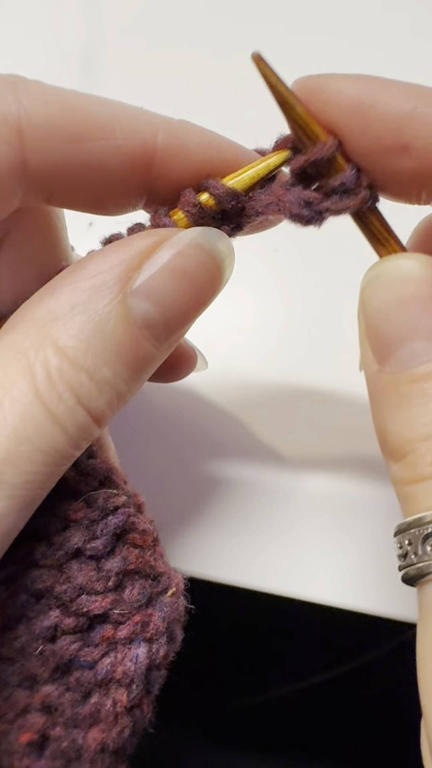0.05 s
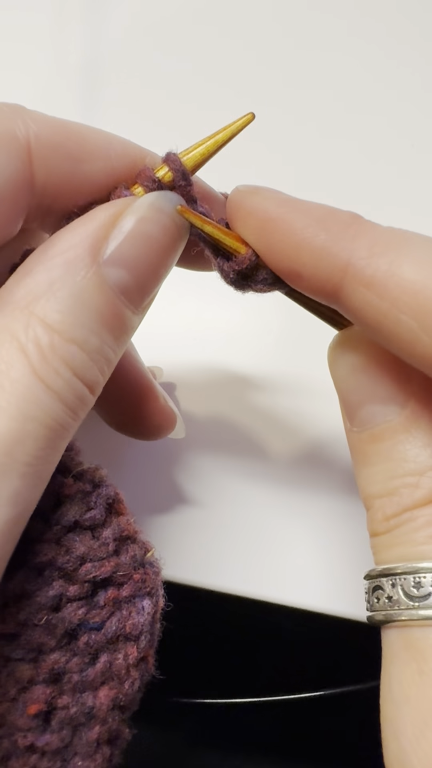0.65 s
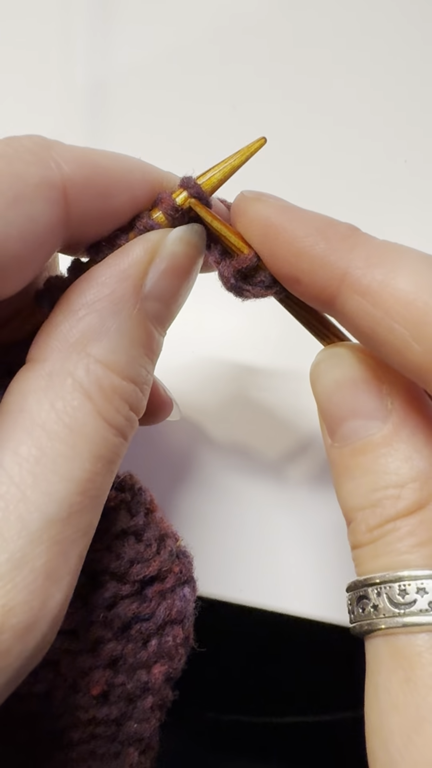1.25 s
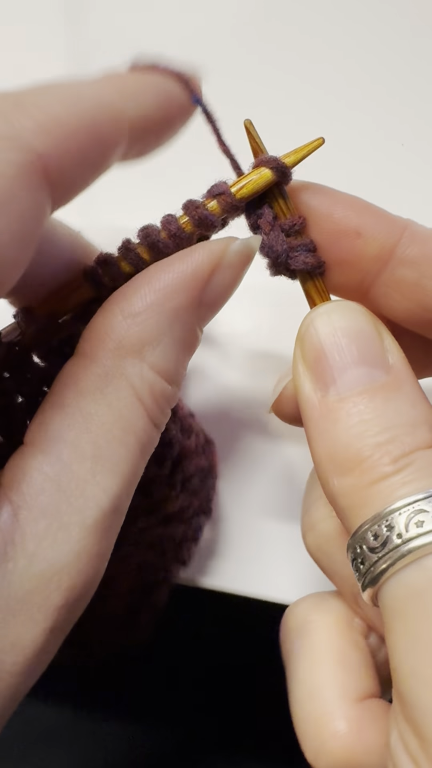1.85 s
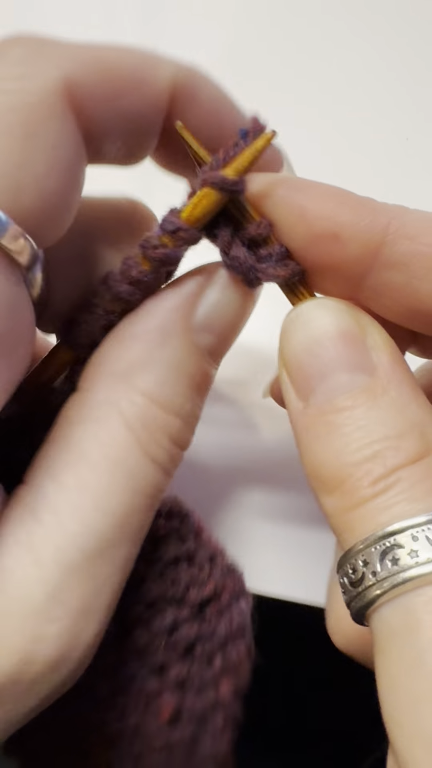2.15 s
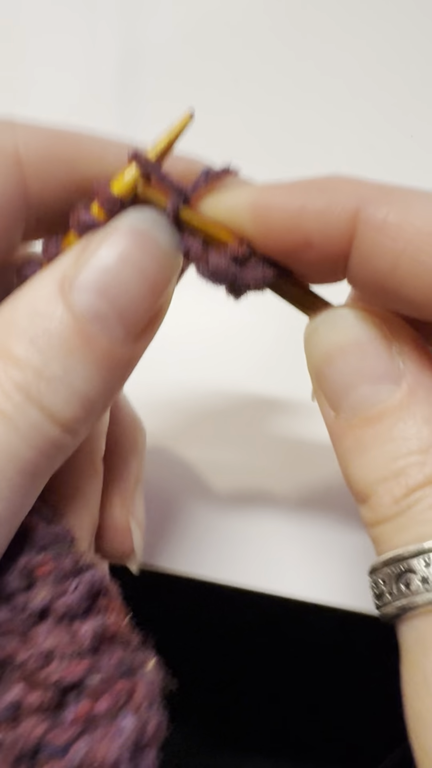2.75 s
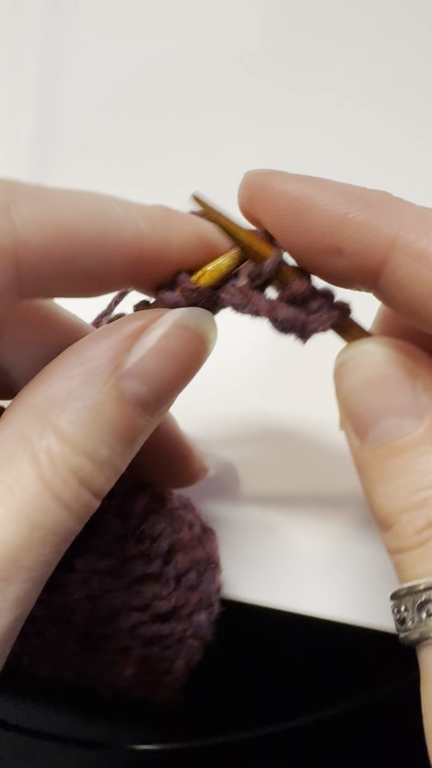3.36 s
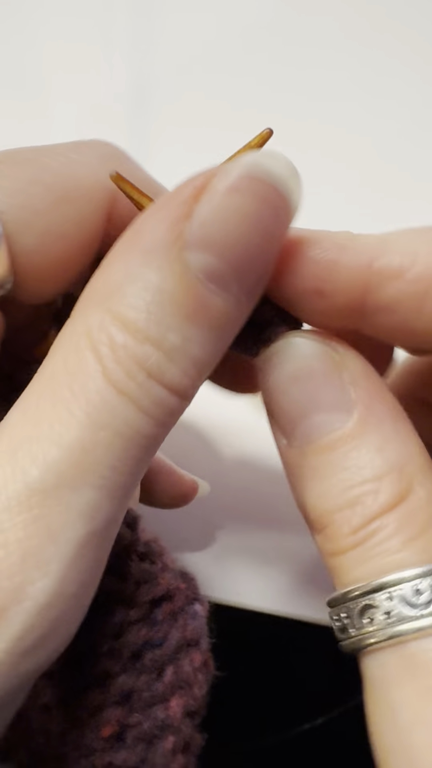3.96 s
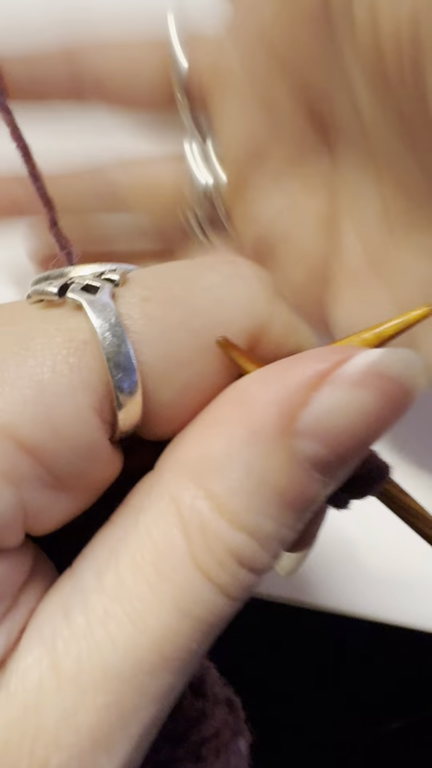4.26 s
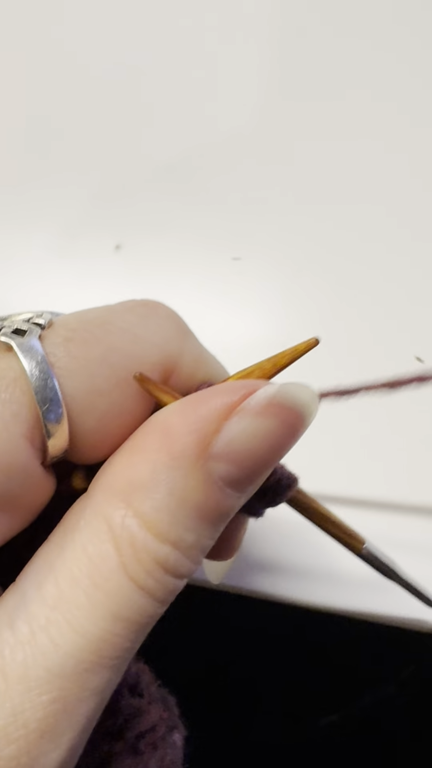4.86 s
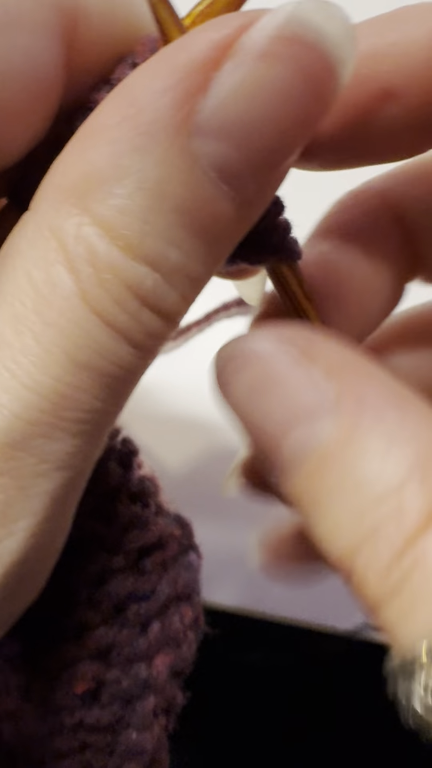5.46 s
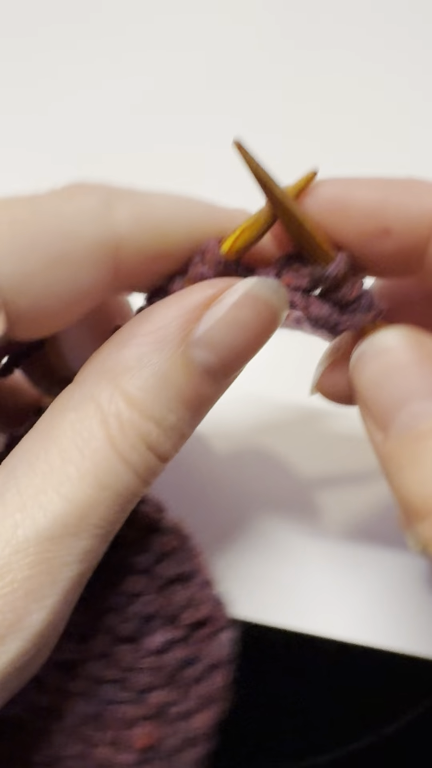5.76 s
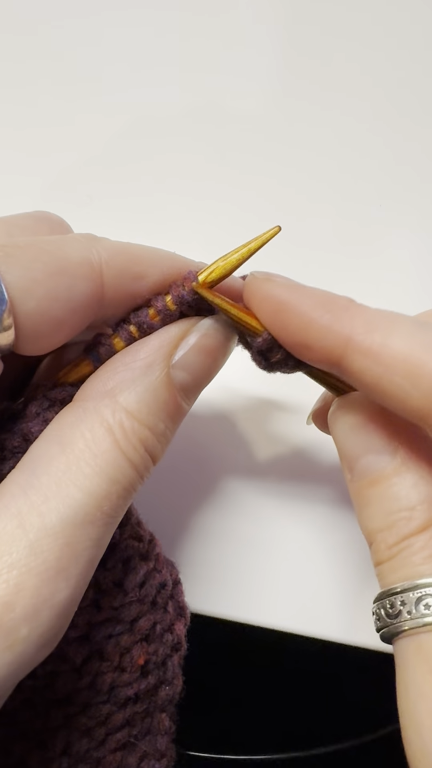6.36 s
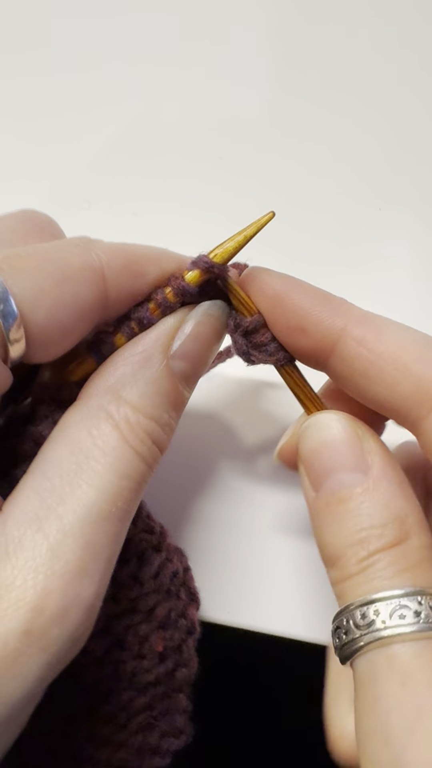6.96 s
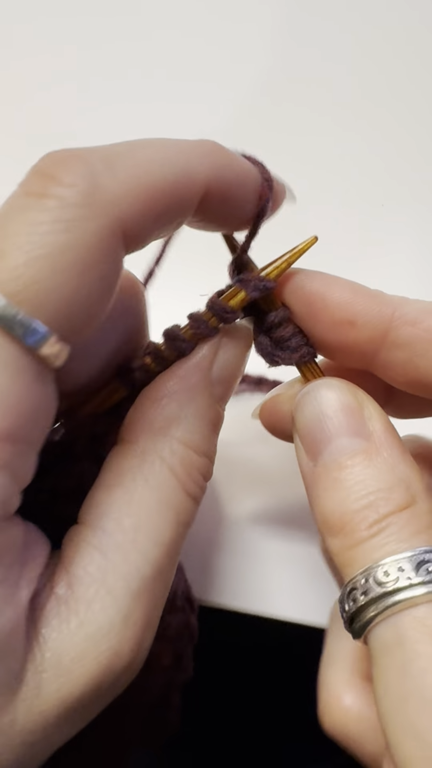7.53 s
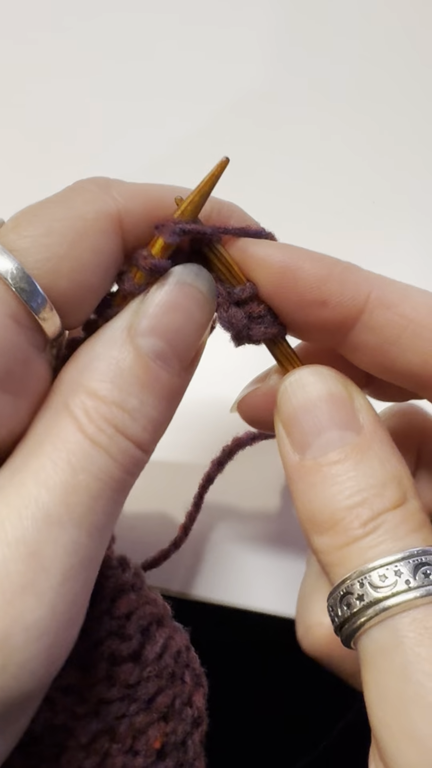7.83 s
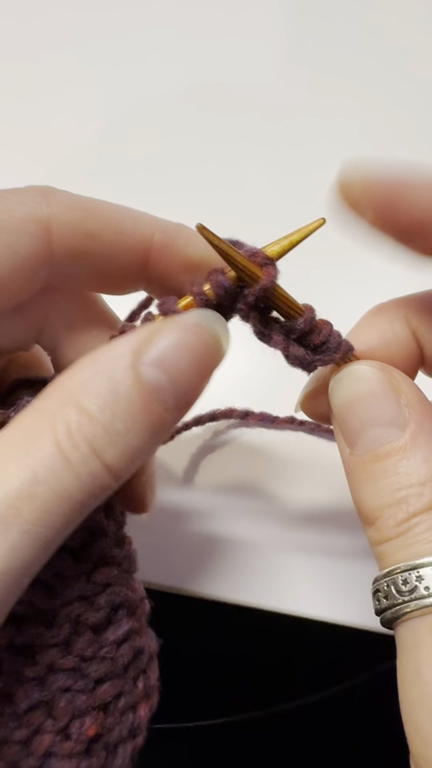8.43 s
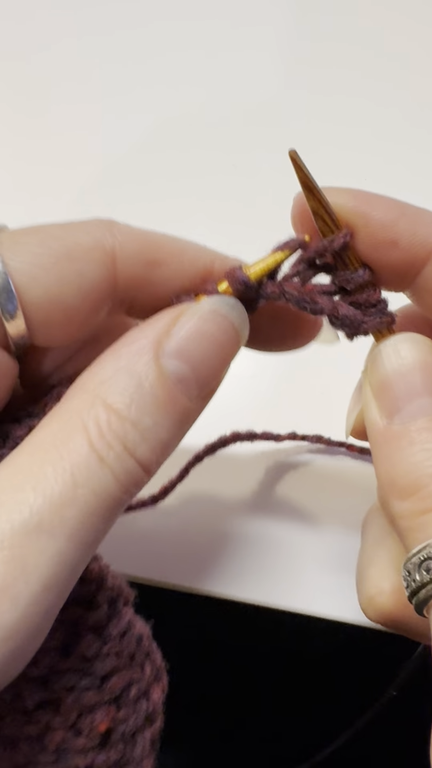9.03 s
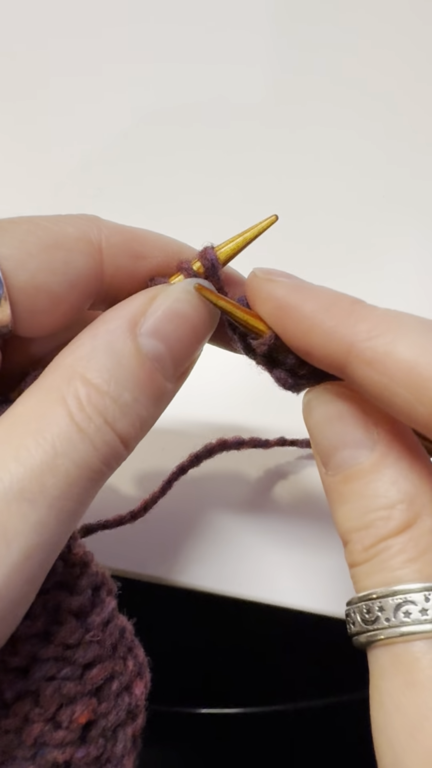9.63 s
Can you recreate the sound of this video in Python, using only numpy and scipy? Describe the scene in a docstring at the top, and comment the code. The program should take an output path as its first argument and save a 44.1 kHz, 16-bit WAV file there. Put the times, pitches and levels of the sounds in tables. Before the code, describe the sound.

Close, quiet knitting: soft yarn rasps and small needle clicks, interrupted midway by a short hard clatter and the low rub of pulled yarn.

```python
"""A quiet room, knitting close to a phone's two closely spaced microphone ports, over a soft rumble.
Wool fibres rasp over wooden needles; the tips tick, knock and graze each other.
Midway a hand tugs at the yarn, something hard clatters on the table a little further off,
and the strand runs off the ball with a low rub. Near the end comes one dry click of wood on wood."""
import sys
import numpy as np
from scipy import signal
from scipy.fft import rfft, irfft
from scipy.io import wavfile
from scipy.ndimage import uniform_filter1d

SR = 44100
rng = np.random.default_rng(int(sys.argv[2]) if len(sys.argv) > 2 else 0)


def unload_audio(sound):
    """Save the sound as a 16-bit wav file, at the path given as the first command line argument."""
    columns = np.transpose(np.atleast_2d(sound))
    # keep every value between -1 and 1, then stretch to whole-number steps
    steps = np.round(np.clip(columns, -1, 1) * 32767)
    wavfile.write(sys.argv[1], SR, steps.astype(np.int16))


N = 427329
TIME = np.arange(N) / SR
SIDES = np.array([[1], [-1]])  # sign of a side signal at the left and right port


def undb(db):
    """Decibels to gain."""
    return 10 ** (np.asarray(db) / 20)


def unit(x):
    """Scale to rms 1."""
    return x / np.sqrt(np.mean(x ** 2))


def along(points, hz):
    """Read (frequency [Hz], level [dB]) points on a log-frequency axis."""
    f, db = np.transpose(points)
    return np.interp(np.log(np.maximum(hz, 1)), np.log(f), db)


def colour(x, points, size=2048):
    """Minimum-phase filter with the given spectrum."""
    gain = undb(along(points, np.fft.rfftfreq(size, 1 / SR)))
    cepstrum = irfft(np.log(gain))
    cepstrum[1:size // 2] *= 2
    cepstrum[size // 2 + 1:] = 0
    impulse = irfft(np.exp(rfft(cepstrum)))
    return signal.fftconvolve(x, impulse)[:len(x)]


def band(x, lo_hz, hi_hz):
    """Band-pass."""
    sos = signal.butter(2, [lo_hz, min(hi_hz, SR / 2 - 1)], "band", fs=SR, output="sos")
    return signal.sosfilt(sos, x)


def walk(rate):
    """Smooth random drift of rms 1, with `rate` new values a second."""
    hold = max(int(SR / rate), 1)
    steps = np.repeat(rng.standard_normal(N // hold + 1), hold)
    return unit(uniform_filter1d(steps, hold)[:N])


def fade(t60, size=16384):
    """Exponential decay, 60 dB in t60 seconds."""
    return np.exp(-np.log(1000) * TIME[:size] / t60)


def ring(hz, t60, size=16384):
    """One struck mode."""
    return np.sin(2 * np.pi * hz * TIME[:size]) * fade(t60, size)


def burst(t60, points, rough=1, size=16384):
    """A contact: a sharp push and a rough after-rattle, with the energy of 1 ms at full level."""
    push = rough * rng.standard_normal(size) * fade(t60, size)
    push[0] = 1
    x = colour(push, points)
    return x / np.sqrt(np.sum(x ** 2) * 1000 / SR)


def slips(rate):
    """Fibres catching and letting go: `rate` random clicks a second, a few larger than the rest."""
    happens = rng.random(N) < rate / SR
    size_db = 2.2 * np.minimum(rng.exponential(size=N), 4)
    return happens * rng.standard_normal(N) * undb(size_db)


def add(out, s, x):
    """Mix a sound in at time s."""
    i = int(s * SR)
    out[..., i:i + x.shape[-1]] += x[..., :N - i]


# room air common to both ports: (frequency [Hz], level [dB])
AIR_SPECTRUM = [(20, -21.5), (45, -3), (65, 3.5), (97, -4), (130, -1.5), (165, -3), (290, -4.5),
                (390, -6.5), (560, -15.5), (800, -16), (1100, -24), (1700, -39), (4500, -45.5),
                (6300, -40.5), (9500, -47.5), (11500, -48), (15300, -38), (16200, -52.5)]
# room air between the ports: (frequency [Hz], side relative to mid [dB])
AIR_SIDE = [(100, -16.5), (300, -9), (500, -0.5), (800, 6), (1500, 0.5), (3000, -5.5), (8000, -8.5)]


def ventilation(level_db=-61):
    """Ventilation rumbles all around the microphone, wavering a little."""
    side_spectrum = [(hz, db + along(AIR_SIDE, hz)) for hz, db in AIR_SPECTRUM]
    mid = colour(rng.standard_normal(N), AIR_SPECTRUM, size=8192)
    side = colour(rng.standard_normal(N), side_spectrum, size=8192)
    return (mid + side * SIDES) / np.std(mid) * undb(level_db + .5 * walk(11))


def hum(hz=64.5):
    """A low background hum, drifting in phase and level."""
    return np.sin(2 * np.pi * hz * TIME + 0.63 * walk(6)) * undb(-72 + 2.5 * walk(6.7))


# strength of the whine's pips: (time [s], level [dB])
WHINE_LEVELS = [(1.3, -87), (2.8, -76.5), (6.9, -81.5), (8, -70), (9.5, -73.5)]


def whine(hz=6605, first_s=.215, period_s=.3705):
    """A very faint high tone pulses evenly in the background."""
    level = undb(np.interp(TIME, *np.transpose(WHINE_LEVELS)))
    pips = np.maximum(np.cos(2 * np.pi * (TIME - first_s) / period_s), 0) ** 14
    return level * pips * np.sin(2 * np.pi * hz * TIME)


def walls(x, t60_low, t60_high, wet_db, treble_db):
    """A small furnished room: a diffuse tail, shorter and weaker in the treble."""
    size = SR // 2
    noise = rng.standard_normal((3, size))
    noise = noise[0] + 0.29 * noise[1:]  # both ports hear nearly the same tail
    low = band(noise, 150, 4400) * fade(t60_low, size)
    high = undb(treble_db) * band(noise, 3500, 11000) * fade(t60_high, size)
    tail = (low + high) * np.clip(TIME[:size] / 0.0056, 0, 1)
    return undb(wet_db) * signal.fftconvolve(x[None], tail, axes=1)[:, :N]


# the room's answer to the clatter: (frequency [Hz], level [dB])
WASH_SPECTRUM = [(150, -14.5), (400, -5.5), (700, 2), (1100, -7), (1500, -3), (2500, -4), (3400, -2),
                 (5000, -7.5), (8000, -12), (15000, -20.5)]


def wash(x, gain_db=-47, t60=0.34):
    """The room answers the clatter with a soft, diffuse tail."""
    size = SR // 2
    common, left, right = (unit(colour(rng.standard_normal(size), WASH_SPECTRUM)) for _ in range(3))
    envelope = fade(t60, size) * np.clip(TIME[:size] / 0.012, 0, 1)
    tail = (common + 0.32 * np.array([left, right])) * envelope
    return undb(gain_db) * signal.fftconvolve(x[None], tail, axes=1)[:, :N]


# the table top's deep modes: (frequency [Hz], level [dB], t60 [s])
DEEP_MODES = [(108, 0.5, 0.098), (185, -1.5, 0.057)]


def thump(rise_s=.004):
    """The whole table top gives under a contact, building over a few milliseconds."""
    body = sum(undb(db) * ring(hz, t60) for hz, db, t60 in DEEP_MODES)
    return body * (1 - np.exp(-TIME[:len(body)] / rise_s))


# the table's modes, damped by the hand that lies on it: (frequency [Hz], level [dB], t60 [s])
TABLE_MODES = [(332, -6, 0.06), (503, 6, .04), (713, -3.5, 0.04), (978, 4.5, 0.042), (1118, 3, .04),
               (1285, -8.5, .04), (1447, 2.5, 0.05), (1588, 3.5, 0.042), (1680, -0.5, 0.037),
               (1880, -5, 0.021), (2105, -7.5, .04), (2244, -4.5, .045), (2670, -4.5, 0.033),
               (3430, -12.5, 0.04)]


def table_ring(lean_db, lag_s, detune=.02, scatter_db=2):
    """One blow at both ports; the middle modes arrive by reflection, later and weaker on the left."""
    out = np.zeros((2, SR // 2))
    spot = rng.standard_normal((len(TABLE_MODES), 2))  # each blow lands elsewhere and shifts the modes
    for (hz, db, t60), (shift, strength) in zip(TABLE_MODES, spot):
        reflected = 450 < hz < 1550
        mode = undb(db + scatter_db * strength) * ring(hz * (1 + detune * shift), t60, size=8192)
        mode = mode * rng.choice([-1, 1])
        add(out[0], reflected * lag_s, undb(-lean_db * reflected) * mode)
        add(out[1], 0, undb(lean_db * reflected) * mode)
    return out


# bright chatter of a hard contact: (frequency [Hz], level [dB])
RATTLE_SPECTRUM = [(400, -16.5), (1500, -12), (3800, -8), (5300, -17), (6500, -5.5), (8000, -5.5),
                   (9800, 0.5), (12500, -1.5), (14900, 9.5), (16500, -7.5)]
# the board's dense modes, merged into a rough clack: (frequency [Hz], level [dB])
BOARD_SPECTRUM = [(60, -13.5), (280, -3.5), (500, 2.5), (800, -2.5), (1100, 0), (1600, -0.5), (2000, -4.5),
                  (2500, -2), (3300, -12.5), (4300, -20), (12000, -31.5)]
# hard contacts on the table: (time [s], rattle [dB], rattle length [s], blow gain [dB], thump [dB])
TABLE_CONTACTS = [(4.2112, -27, 0.016, -27.5, -55.5), (4.217, -24, .002, -31, -39),
                  (4.2215, -15.5, 0.0009, -34.5, -60), (4.2334, -20.5, 0.005, -32.5, -55),
                  (4.245, -38.5, .003, -41, -59.5), (4.253, -39, 0.0036, -44, -61),
                  (4.2665, -12, 0.002, -23.5, -48), (4.270, -16, 0.0022, -26, -55),
                  (4.2745, -29.5, 0.0043, -25.5, -55), (4.2789, -18, 0.004, -22.5, -55),
                  (4.2822, -27, .005, -16.5, -27), (4.2893, -39, .003, -27, -40.5)]


def clatter():
    """Beyond the hands, each contact chatters brightly and shakes the table; the heavy ones thump."""
    out = np.zeros((2, N))
    t = TIME[:int(.05 * SR)]
    for s, rattle_db, length_s, blow_db, thump_db in TABLE_CONTACTS:
        direct, scattered = (unit(colour(rng.standard_normal(len(t)), RATTLE_SPECTRUM)) for _ in range(2))
        rattle = direct + undb(-16.5) * scattered * SIDES
        add(out, s, undb(rattle_db) * rattle * np.exp(-(t / length_s) ** 1.6))
        clack = burst(0.036, BOARD_SPECTRUM) + undb(-5.5) * burst(.04, BOARD_SPECTRUM) * SIDES
        add(out, s, undb(blow_db - 4) * clack)
        add(out, s, undb(blow_db - 12) * table_ring(lean_db=2.5, lag_s=0.00018))
        add(out, s, undb(thump_db) * thump())
    return out


# light rebounds on the table after the clatter: (time [s], level [dB])
BOUNCES = [(4.3056, -38), (4.318, -39), (4.3335, -46), (4.3452, -40.5), (4.352, -44)]


def rebounds():
    """The fallen thing settles in a few quick, uneven bounces, as bright as the needles' ticks."""
    out = np.zeros(N)
    for s, db in BOUNCES:
        snap = burst(.009, TIP_SPECTRUM, rough=.55)
        ringing = undb(-6.5) * burst(.009, SHAFT_SPECTRUM, rough=.41)
        body = undb(-9.5) * burst(.015, WOOD_SPECTRUM, rough=.24)
        add(out, s, undb(db) * (snap + ringing + body))
    return out


# the click, direct to the microphone: (frequency [Hz], level [dB])
CLICK_SPECTRUM = [(300, -26), (450, -7), (880, 1), (1100, 0), (1400, -8), (2000, 1), (2900, -15),
                  (3600, -23), (4900, -8), (6500, -22.5), (9500, -37), (12500, -22), (15000, -27)]
# its afterwash from the room: (frequency [Hz], level [dB])
AFTERWASH_SPECTRUM = [(300, -10), (1200, -1.5), (2500, -5), (3600, -14), (6500, -10), (10000, -15)]


def click(at_s=9.2322):
    """One dry click of wood on wood, with a faint, even afterwash."""
    out = np.zeros(N)
    add(out, at_s, undb(-32.5) * burst(0.0029, CLICK_SPECTRUM, rough=0.071))
    add(out, at_s, undb(-51.5) * burst(0.21, AFTERWASH_SPECTRUM))
    return out


# grazed needle shafts: (frequency [Hz], level [dB])
SCRAPE_SPECTRUM = [(700, -21.5), (1640, -5), (2500, -20), (3490, -7.5), (4600, -13.5), (5500, -8.5),
                   (6340, 1), (6900, -4.5), (7450, -4), (9500, -13), (15000, -19)]
# grazes near the microphone: (time [s], half width [s], level [dB])
GRAZES = [(1.738, .008, -68), (1.80, .005, -63), (1.86, 0.0064, -63.5), (1.896, .008, -63),
          (2.105, .012, -66), (2.19, .005, -67), (2.5528, 0.0047, -53), (2.829, 0.0049, -62.5),
          (2.979, 0.0053, -58.5), (3.058, .003, -67), (5.812, .005, -64), (7.207, .006, -65),
          (7.287, .004, -60.5), (7.495, .014, -66), (7.993, 0.0055, -63), (8.177, 0.0046, -62),
          (8.384, 0.0037, -58.5), (8.845, .005, -65), (9.015, .008, -65), (9.11, .008, -73)]


def scrapes():
    """A tip grazes the other needle: a brief cluster of slips that rings the shafts."""
    pressure = np.zeros(N)
    t = TIME[:SR // 8] - 1 / 16
    for s, width_s, db in GRAZES:
        add(pressure, s + t[0], undb(db) * np.exp(-np.abs(t) / width_s))
    return pressure * unit(colour(slips(rate=6000), SCRAPE_SPECTRUM))


# needle across needle, close up: (time [s], level [dB], pitch [Hz], t60 [s])
NEEDLE_SCUFFS = [(4.592, -51, 2030, .1), (4.724, -57, 1980, 0.067), (5.073, -40, 550, 0.077),
                 (5.074, -54, 1600, 0.069), (7.140, -46, 1000, 0.13), (7.19, -48.5, 850, 0.075),
                 (7.984, -54.5, 1690, 0.07)]


def scuffs():
    """One needle scuffs across the other and chatters around one pitch."""
    out = np.zeros(N)
    for s, db, hz, t60 in NEEDLE_SCUFFS:
        spectrum = [(hz / 4, -18), (hz * 0.23, -7), (hz, 0), (hz * 1.35, -13), (hz * 8, -36)]
        add(out, s, undb(db) * burst(t60, spectrum))
    return out


# close knocks: (time [s], level [dB], pitch [Hz], t60 [s], relative snap [dB])
DAMPED_KNOCKS = [(2.827, -39, 290, 0.027, -45), (2.98, -34.5, 268, 0.063, -45),
                 (3.483, -42.5, 430, 0.017, -40), (3.959, -42, 70, 0.092, -43),
                 (4.046, -36, 73, 0.061, -49), (4.459, -35, 304, 0.093, -41), (4.63, -37, 60, 0.14, -58),
                 (4.757, -33.5, 273, 0.1, -43), (5.158, -54.5, 950, 0.094, -30),
                 (5.197, -37, 242, 0.025, -40), (7.139, -47, 1380, 0.017, -18),
                 (7.142, -46.5, 1020, .016, -29), (7.18, -53, 1200, 0.032, -30),
                 (7.1944, -44.5, 946, 0.019, -30)]


def knocks():
    """Needles and hands knock: one mode, damped by fingers and wool, under a tiny bright snap."""
    out = np.zeros(N)
    snap = ring(4900, 0.0021) + undb(-8) * ring(12400, 0.0029)
    for s, db, hz, t60, snap_db in DAMPED_KNOCKS:
        body = ring(hz, t60)
        body *= 1 - np.exp(-2 * hz * TIME[:len(body)])  # a cushioned push takes half a cycle to build
        add(out, s, undb(db) * (body + undb(snap_db) * snap))
    return out


# a needle's tip, shaft and wooden body, each: (frequency [Hz], level [dB])
TIP_SPECTRUM = [(4000, -34.5), (8000, -24), (10000, -7), (12000, -4), (15000, 4), (16500, -8.5)]
SHAFT_SPECTRUM = [(1500, -30.5), (3200, -22), (4500, -8), (5700, -3), (6800, -0.5), (8200, -5.5),
                  (10000, -12), (14000, -29.5)]
WOOD_SPECTRUM = [(400, -19.5), (900, -1.5), (1600, 1), (2400, -5.5), (3200, -11), (4800, -16.5),
                 (8000, -27), (14000, -34)]
# light touches near the microphone: (time [s], tip [dB], shaft [dB], body [dB])
TIP_TOUCHES = [(0.8, -61, -75, -80), (1.799, -52, -51, -78), (2.3033, -45, -50.5, -60),
               (2.412, -46.5, -60, -69), (2.6521, -53, -70, -81), (3.242, -49, -62, -76),
               (3.396, -43, -49.5, -64), (3.483, -38, -38, -58), (3.836, -44, -43.5, -52.5),
               (4.135, -57, -61, -86), (4.1826, -52, -62.5, -65), (4.828, -38.5, -52, -51),
               (5.13, -46, -54.5, -59), (5.185, -33.5, -56, -57), (5.3537, -44, -53.5, -62),
               (5.402, -39, -57, -61), (5.532, -38, -52, -66), (6.044, -55, -49, -75),
               (6.236, -73, -71, -82.5), (6.297, -66.5, -63, -73), (6.668, -76.5, -72, -85),
               (6.7599, -59, -69, -70), (7.3081, -47, -49, -59), (7.7748, -27.5, -37.5, -51.5),
               (8.0285, -52, -66, -73), (8.4081, -60, -56, -61), (8.4138, -62, -58, -65),
               (9.388, -53, -70.5, -76)]


def ticks():
    """Needle tips and nails touch: the tip snaps, the shaft rings, the wooden body sounds longest."""
    out = np.zeros(N)
    for s, tip_db, shaft_db, body_db in TIP_TOUCHES:
        add(out, s, undb(tip_db) * burst(0.0039, TIP_SPECTRUM, rough=0.48))
        add(out, s, undb(shaft_db) * burst(0.0058, SHAFT_SPECTRUM, rough=0.2))
        add(out, s, undb(body_db) * burst(0.026, WOOD_SPECTRUM, rough=0.24))
    return out


def gesture(start, length, swell_s, release_s, sag_db_per_s=8.5):
    """Speed of one hand movement: it swells, holds while easing a little, and dies away."""
    speed = np.zeros(N)
    near = slice(max(int((start - .5) * SR), 0), int((start + length + .5) * SR))
    t = TIME[near] - start
    swell = (1 + np.tanh(t / swell_s / 2)) / 2
    ebb = (1 - np.tanh((t - length) / release_s / 2)) / 2
    speed[near] = swell * ebb * undb(-sag_db_per_s * np.clip(t, 0, length))
    return speed


def wander(x, depth_db=1, rate=28):
    """The point of contact shifts, so three treble bands each swell and sink on their own."""
    edges_hz = np.geomspace(1500, 10000, 4)
    return x + sum(band(x, lo, hi) * (undb(depth_db * walk(rate)) - 1)
                   for lo, hi in zip(edges_hz, edges_hz[1:]))


# wool close up: hissing fibres, the finest fibres, the tight strand, each: (frequency [Hz], level [dB])
FIBRE_SPECTRUM = [(900, -28), (2500, -23.5), (4000, -9.5), (5000, -8), (5900, -3.5), (6600, -4.5),
                  (7900, -4.5), (9700, -8), (12000, -22.5), (16000, -39.5)]
SHEEN_SPECTRUM = [(8000, -35.5), (9800, -14), (10900, -4), (13500, -1), (15400, 1.5), (16000, -22.5)]
DRAG_SPECTRUM = [(250, -6.5), (700, -1), (1400, -3), (2400, 0.5), (3300, -5), (5000, -5), (9000, -26)]


def rasp(hiss, drag, sheen):
    """Wool rubs in jerks: fibres hiss and scratch, the finest add sheen, the strand drags lower down."""
    fibres = undb(-2) * unit(colour(slips(rate=5000), FIBRE_SPECTRUM))
    scratch = unit(colour(slips(rate=500), SCRAPE_SPECTRUM)) * undb(-13 + 3.1 * walk(50))
    fine = unit(colour(slips(rate=6500), SHEEN_SPECTRUM))
    coarse = unit(colour(slips(rate=5000), DRAG_SPECTRUM))
    jerks = undb(walk(90) + 0.95 * walk(25))
    rub = wander(hiss * (fibres + scratch) + drag * coarse)
    return jerks * (rub + sheen * fine)


# fast runs of the strand: (time [s], half width [s], lower pitch [Hz], lower band [dB], upper band [dB])
FAST_RUNS = [(4.40, .02, 5820, -56, -57), (4.44, .018, 5600, -53, -53.5), (4.476, 0.023, 5500, -64, -68),
             (4.728, 0.01, 5360, -63, -63), (4.765, 0.02, 4750, -63, -55.5), (4.803, 0.015, 4300, -59, -53),
             (4.872, 0.024, 5480, -66, -66)]


def zips(width_hz=1300, upper_hz=8120, fall_hz_per_s=7160):
    """At its fastest the strand sings in two narrow bands; the lower falls as the free length grows."""
    out = np.zeros(N)
    t = TIME[:SR // 4] - 1 / 8
    for s, width_s, hz, low_db, high_db in FAST_RUNS:
        low, high = (unit(band(rng.standard_normal(len(t)), 20, width_hz / 2)) for _ in range(2))
        low *= undb(low_db) * np.sin(2 * np.pi * np.cumsum(hz - fall_hz_per_s * t) / SR)
        high *= undb(high_db) * np.sin(2 * np.pi * upper_hz * t)
        add(out, s + t[0], (low + high) * np.exp(-(t / width_s) ** 2))
    return out


# yarn drawn off the ball: (time [s], length [s], swell [s], low rub [dB], hiss [dB], drag [dB])
YARN_PULLS = [(4.306, 0.21, 0.0035, -45.5, -62.5, -59), (4.585, 0.092, 0.0033, -48, -67.5, -66),
              (4.734, 0.19, 0.0087, -45, -67, -62), (5.067, 0.23, .005, -59, -69.5, -69)]
# the strand's low rub: (frequency [Hz], level [dB])
RUB_SPECTRUM = [(30, -11), (60, -6.5), (150, -9.5), (220, -3.5), (285, 5), (400, -8), (600, -11.5),
                (1100, -23), (1700, -32.5), (4000, -48)]


def strand(hollow_hz=4100, echo_growth_per_s=2.4, echo_db=-8.5, ply_hz=93.3, ripple_db=1):
    """Pulled yarn rubs over ball and hand: a low flutter, a rasp with a falling hollow, short zips."""
    low = hiss = drag = 0
    drawn_s = np.zeros(N)  # time since the latest pull began
    for start, length, swell_s, rub_db, hiss_db, drag_db in YARN_PULLS:
        speed = gesture(start, length, swell_s, release_s=0.019)
        low += undb(rub_db) * speed
        hiss += undb(hiss_db) * speed
        drag += undb(drag_db) * speed
        drawn_s = np.where(TIME > start - 3 * swell_s, np.maximum(TIME - start, 0), drawn_s)
    direct = rasp(hiss, drag, sheen=undb(2) * hiss)
    # the reflection off the receding hand leaves a hollow that sweeps down during each pull
    echo_s = (1 + echo_growth_per_s * drawn_s) / (2 * hollow_hz)
    echo = undb(echo_db) * np.interp(TIME - echo_s, TIME, direct)
    rasping = undb(-0.5) * (direct + echo)
    plies = undb(ripple_db * np.sin(2 * np.pi * ply_hz * TIME + 1.5 * walk(36)))
    rub = unit(colour(rng.standard_normal(N), RUB_SPECTRUM)) * undb(1.2 * walk(35))
    return low * rub + plies * (rasping + zips())


# a needle pushing through a stitch, or wool sliding along it, close to the microphone:
# (time [s], length [s], swell [s], release [s], level [dB], relative drag [dB], relative sheen [dB])
STITCH_STROKES = [(0, 0.012, 0.0076, 0.0077, -58, -2.5, 4), (0.111, 0.06, 0.011, 0.025, -68.5, -15, 3),
                  (0.259, 0.071, .012, 0.016, -65, -12.5, 3), (1.402, 0.019, 0.0031, 0.0043, -71, -20, 10),
                  (1.533, 0.068, 0.0093, 0.018, -72, -4.5, 5), (1.719, 0.11, 0.028, 0.008, -67.5, -8, 3),
                  (1.855, 0.067, .008, .016, -65, -15, 1.5), (2.045, 0.11, 0.025, 0.017, -63.5, -9.5, 1),
                  (2.169, 0.16, .012, 0.012, -73, -14, 7), (2.415, 0.17, 0.022, 0.012, -73, -19, 4.5),
                  (2.658, 0.076, 0.0081, 0.025, -67.5, -28, 4), (2.794, 0.063, .012, 0.011, -77, -2, 9),
                  (2.878, 0.04, 0.0084, 0.013, -60, -10, 2), (2.937, 0.076, 0.0073, 0.027, -69.5, -5, 5),
                  (3.082, 0.091, 0.013, 0.016, -61.5, -19, -2.5),
                  (3.275, 0.054, 0.02, 0.012, -66.5, -22, -3), (3.347, 0.1, 0.013, .013, -73, -7, 1),
                  (3.469, 0.12, 0.012, 0.025, -63.5, -11, 1.5), (3.664, 0.025, 0.011, 0.011, -61.5, -4, -1),
                  (3.801, 0.049, 0.01, 0.011, -60.5, -6.5, 3), (3.91, 0.08, 0.025, 0.012, -66, -6.5, 1),
                  (4.014, 0.02, 0.0075, 0.012, -58.5, -8.5, 7), (4.14, .15, 0.0097, .013, -78, -3, 0),
                  (5.015, 0.045, 0.017, .013, -73.5, -9.5, 2), (5.336, 0.077, 0.0092, 0.012, -69.5, -2, 2),
                  (5.486, 0.26, 0.018, 0.022, -67, -8, 1), (5.792, 0.05, 0.0069, .016, -64.5, -11, -1),
                  (5.909, 0.11, 0.018, .012, -67, -3, -3), (6.037, 0.11, .01, .019, -66, -3, -4),
                  (6.426, 0.025, 0.0063, 0.0084, -78, -6, 12), (6.487, 0.021, .008, 0.011, -88, -10, 7),
                  (6.755, 0.028, .01, .013, -81, -5, 4), (6.873, 0.28, 0.017, 0.034, -84.5, -9, 12),
                  (7.199, 0.19, 0.019, 0.019, -67.5, -2.5, 3), (7.468, 0.21, .014, 0.033, -65.5, -1.5, 1.5),
                  (7.733, 0.083, .014, .013, -68.5, -9, 2), (7.981, 0.022, 0.0077, 0.0067, -66, -8.5, 10.5),
                  (8.097, 0.07, 0.0083, .013, -73.5, -12, 8), (8.164, 0.15, .009, 0.012, -63, -8.5, 2),
                  (8.329, 0.11, 0.015, 0.024, -68.5, -5.5, 2), (8.631, 0.15, .013, 0.013, -72.5, -11, 0),
                  (8.782, .28, 0.014, 0.0083, -67.5, -2.5, -1), (9.074, 0.054, .012, 0.011, -75.5, 2, 1.5),
                  (9.419, 0.06, 0.019, 0.015, -75, -13, 2)]


def wool(fabric_db=-15, fabric_spread_s=0.16):
    """Stitches slide over the needles, stroke by stroke; loose fabric follows and stray fibres snag."""
    hiss, drag, sheen = undb(-94.5), undb(-97), undb(-95.5)  # resting fingers still stir the wool
    for start, length, swell_s, release_s, db, drag_db, sheen_db in STITCH_STROKES:
        speed = undb(db) * gesture(start, length, swell_s, release_s)
        hiss += speed
        drag += undb(drag_db) * speed
        sheen += undb(sheen_db) * speed
    # the loose knitting starts to move sooner than a stroke and settles later
    spread = int(fabric_spread_s * SR)
    hiss, drag, sheen = (x + undb(fabric_db) * uniform_filter1d(x, spread) for x in (hiss, drag, sheen))
    snag_level = undb(-53.5) * (hiss / hiss.max()) ** 0.59  # louder during a stroke
    snags = snag_level * colour(slips(rate=17), SHAFT_SPECTRUM)
    return rasp(hiss, drag, sheen) + snags


def scene():
    """Hands near the microphone, the table a little further off, the room all around."""
    hands = wool() + strand() + ticks() + knocks() + scuffs() + scrapes()
    table = clatter() + rebounds()
    reflections = walls(hands, t60_low=0.14, t60_high=0.1, wet_db=-41.5, treble_db=-3)
    return hands + click() + table + reflections + wash(table.mean(0)) + ventilation() + hum() + whine()


def record(dry):
    """At the phone the treble reaches the right port a moment earlier; the top is cut at 16.3 kHz."""
    hz = np.fft.rfftfreq(N, 1 / SR)
    lag_s = np.interp(hz, [4800, 9000], [0, 43e-6])
    ports = irfft(rfft(dry) * np.exp(-1j * np.pi * hz * lag_s * SIDES), N)
    top_cut = signal.ellip(10, .2, 80, 16300, fs=SR, output="sos")
    return signal.sosfilt(top_cut, ports)


dry = scene()
out = record(dry)
unload_audio(out)
```